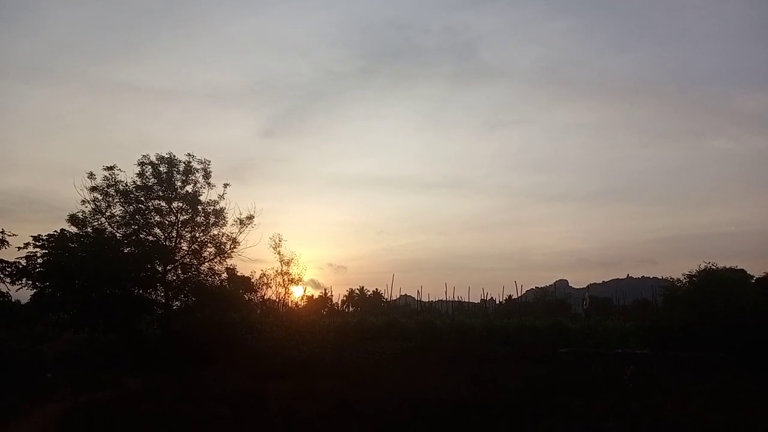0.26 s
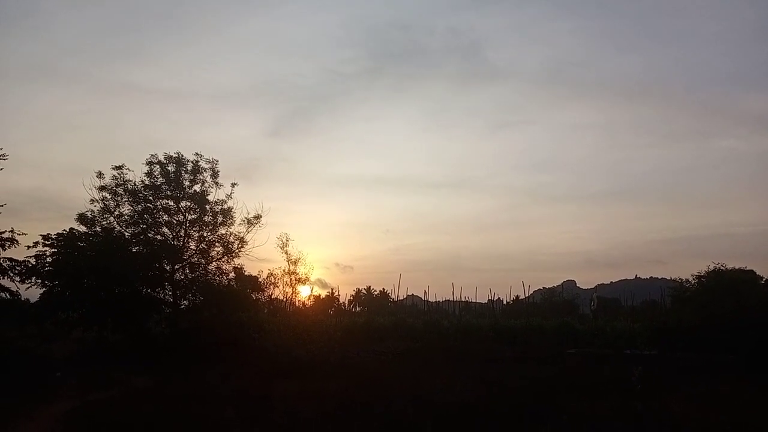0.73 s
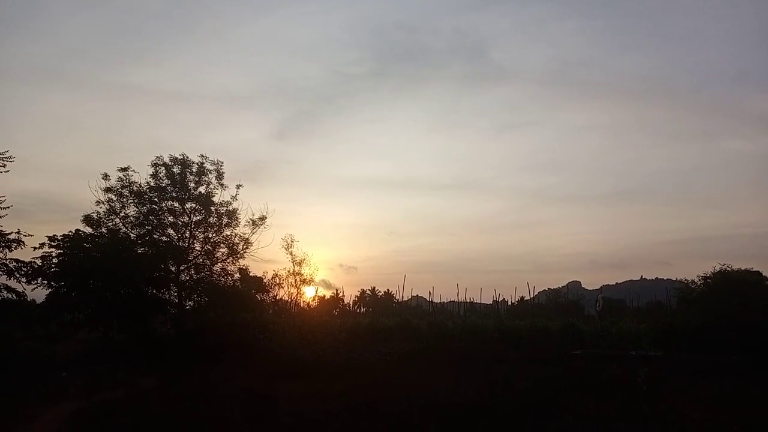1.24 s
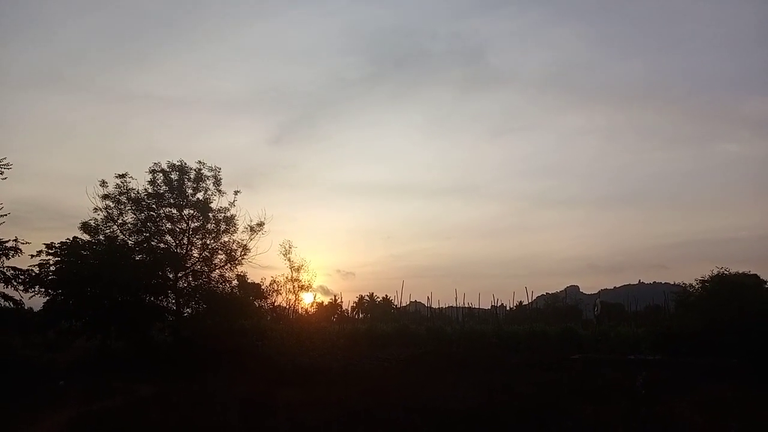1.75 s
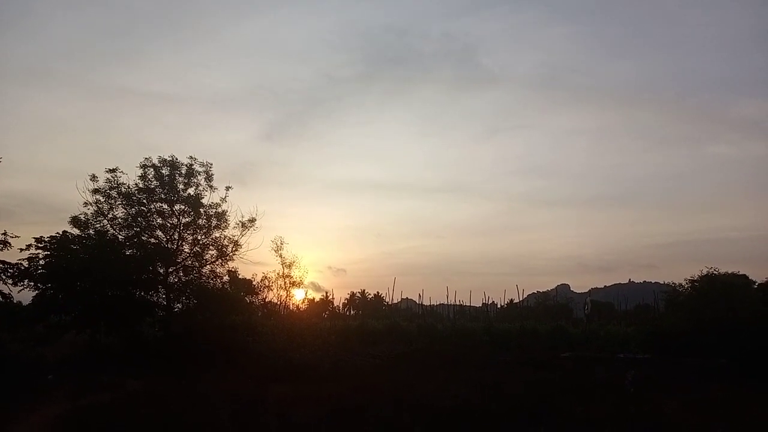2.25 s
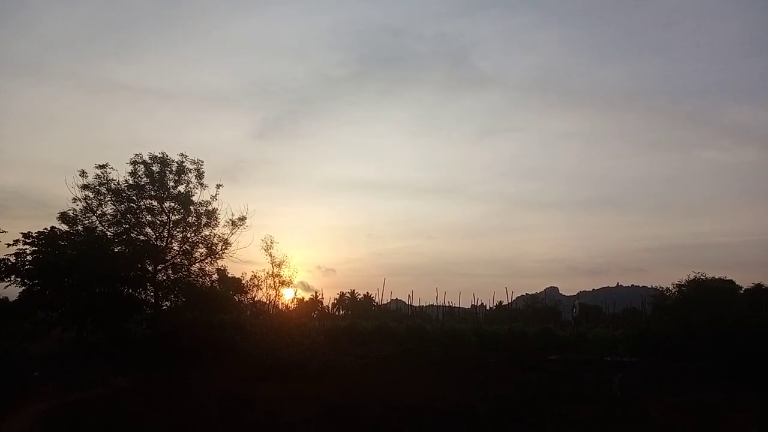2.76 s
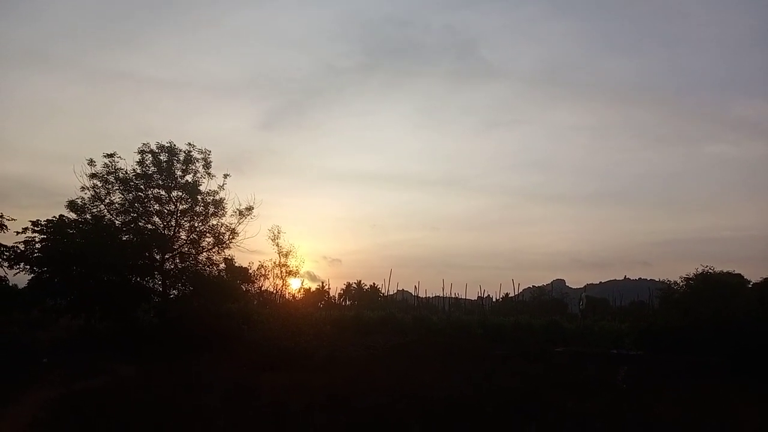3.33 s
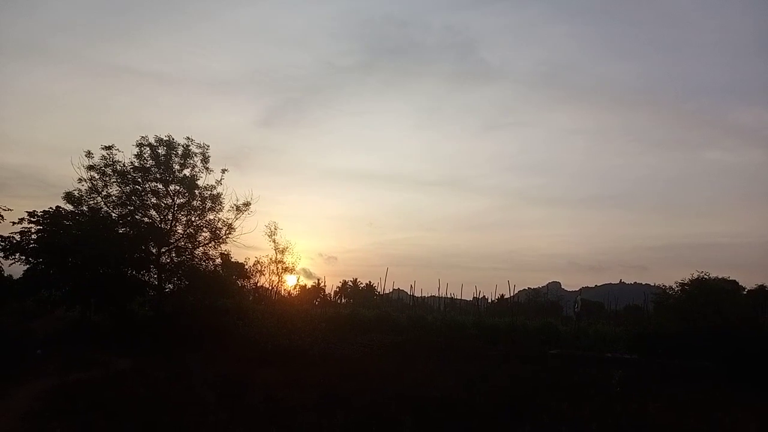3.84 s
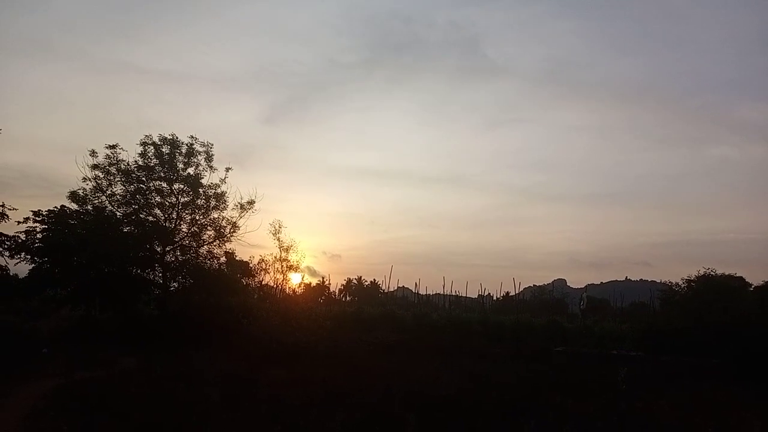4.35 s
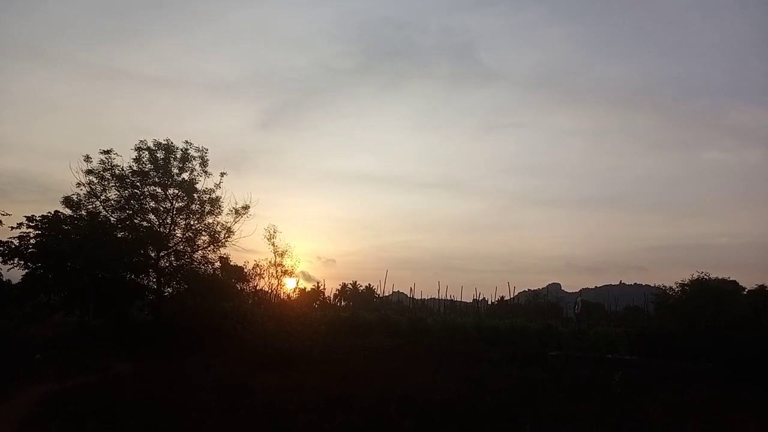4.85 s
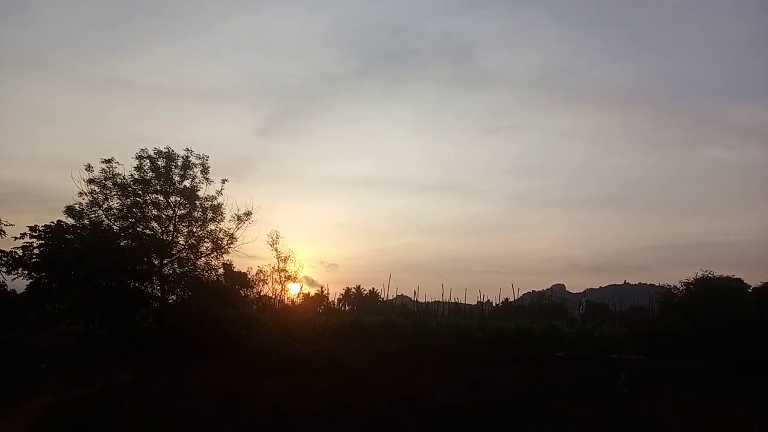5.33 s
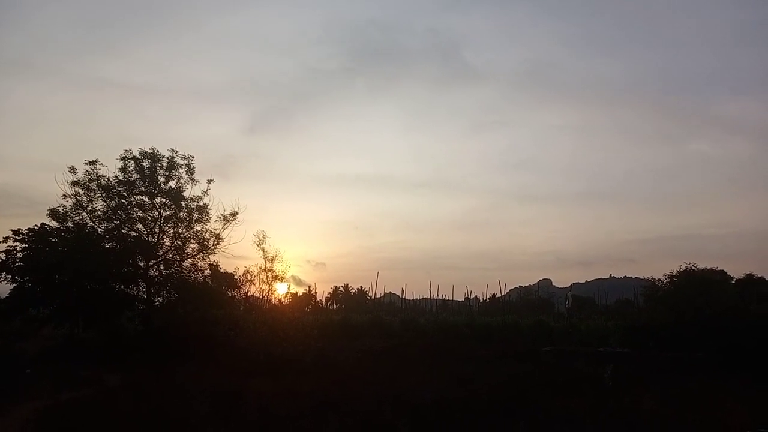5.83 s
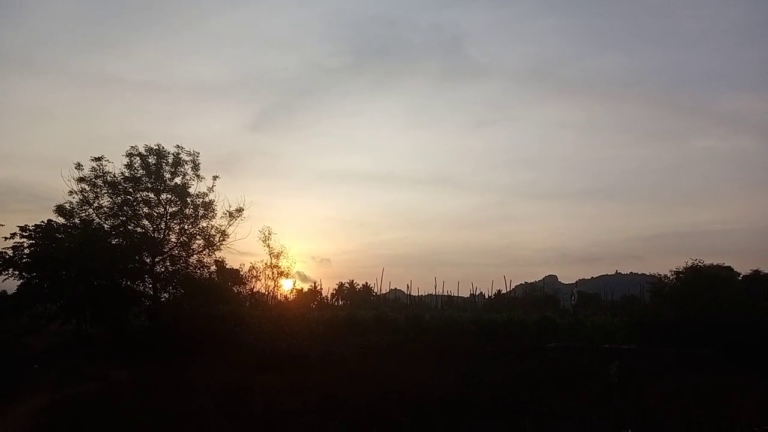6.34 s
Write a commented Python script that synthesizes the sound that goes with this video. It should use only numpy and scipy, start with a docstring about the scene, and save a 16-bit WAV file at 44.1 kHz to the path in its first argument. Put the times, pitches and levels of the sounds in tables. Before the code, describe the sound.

Still dawn air in open country with trees, picked up by a small handheld stereo microphone. From about 0.15 to 0.6 s one loud, hollow cuckoo tone dips, swoops up and drops sharply, echoing off trees, while dull bumps knock the microphone. A distant engine putters in a low throbbing hum, strongest in the first second, then recedes; a high patchy hiss holds until 1.3 s and dies away. Far chirps are denser before 2.6 s. Hoarse short squawks come at 1.2, 1.6 and 2.0 s, low yelps at 2.1 and 2.35, with blurred distant rasps. Thin high whistles sink slowly from about 2 to 2.9 and 3.2 to 4.2 s. Small birds chatter around 3.5 and 4.7-5.5 s amid soft hoots and slurs. A faint insect tone flickers after 4.6 s, with one tiny snap. At 6.3 s soft bumps return, then two birds whistle together, one high and sinking, one low and wavering.

```python
"""Dawn over open country. Soft bumps on the microphone open, as a cuckoo's one loud swooping tone rings in the trees.
A distant engine putters as a harmonic series; a high noise hiss over still air holds, then dies away.
Then come hoarse squawks of harmonics and noise, low yelps and thin whistles; small birds chatter in gliding tones,
and far ones hoot, slur, chirp and rasp in narrow noise bands. Later a faint insect tone comes and goes and
one tiny snap ticks; near the end come more bumps, then two birds whistle at once."""
import sys
import numpy as np
from scipy import signal
from scipy.fft import rfft, irfft, next_fast_len
from scipy.io import wavfile
from scipy.ndimage import uniform_filter1d, map_coordinates

SR = 44100
rng = np.random.default_rng(int(sys.argv[2]) if len(sys.argv) > 2 else 0)


def unload_audio(sound):
    """Save the sound as a 16-bit wav file, at the path given as the first command line argument."""
    columns = np.transpose(np.atleast_2d(sound))
    # keep every value between -1 and 1, then stretch to whole-number steps
    steps = np.round(np.clip(columns, -1, 1) * 32767)
    wavfile.write(sys.argv[1], SR, steps.astype(np.int16))


N = 290619  # length in samples
VOICE_ATTACK_S, VOICE_RELEASE_S = 0.0031, 0.0048  # end fades of the cuckoo and of the two phrases


def amp(db):
    """Decibels to gain."""
    return 10 ** (np.asarray(db) / 20)


def unit(x):
    """Scale to rms 1."""
    return x / np.sqrt(np.mean(x ** 2) + 1e-20)


def along(points, hz):
    """Read (Hz, value) points on a log frequency axis."""
    f, v = np.transpose(points)
    return np.interp(np.log(hz + 1), np.log(f + 1), v)


def curves(rows, t):
    """Each column after the time, read at the times t."""
    s, *cols = np.transpose(rows)
    return [np.interp(t, s, c) for c in cols]


def wobble(rate, n):
    """A smooth random curve of n samples, rate knots a second."""
    knots = rng.standard_normal(int(n * rate / SR) + 4)
    return map_coordinates(knots, [np.arange(n) * rate / SR])


def filtered(x, response):
    """Filter x by a response given as a function of frequency."""
    m = next_fast_len(N + SR // 2)
    spectrum = rfft(x, m) * response(np.fft.rfftfreq(m, 1 / SR))
    return irfft(spectrum, m)[..., :N]


def add(track, s, sound):
    """Mix a sound into a track at s seconds."""
    part = track[max(0, round(s * SR)):][:len(sound)]
    part += sound[:len(part)]


def turns(hz):
    """Phase of a moving frequency."""
    return 2 * np.pi * np.cumsum(hz) / SR


def tone(phase):
    """A sine of rms 1."""
    return np.sqrt(2) * np.sin(phase)


def gate(t, attack_s, release_s):
    """Straight fades at both ends of the times t."""
    return np.clip(np.minimum((t - t[0]) / attack_s, (t[-1] - t) / release_s), 0, 1)


def noise(colour, width):
    """Coloured stereo noise; width is the side's share."""
    mid, side = filtered(rng.standard_normal((2, N)), lambda hz: amp(along(colour, hz)))
    return unit(mid) + width * np.outer([1, -1], unit(side))


def patchy(x, depth_db):
    """Break a stereo noise into brief, narrow patches of random gain."""
    z = signal.stft(x, nperseg=512)[2]
    field = uniform_filter1d(rng.standard_normal(z.shape[1:]), size=3, axis=0)  # over frequency
    field = uniform_filter1d(field, size=8, axis=1)  # over time
    return unit(signal.istft(z * amp(depth_db * unit(field)), nperseg=512)[1][:, :N])


def note(length, pitch_hz, glide, arch, rough, rough_rate):
    """Phase and swell of one note: its pitch glides, droops at both ends by the share arch, and trembles."""
    u = np.linspace(-1, 1, max(8, int(length * SR)))
    hz = pitch_hz * (1 + glide * u / 2 - arch * u ** 2)
    phase = turns(hz * (1 + rough * wobble(rough_rate, len(u))))
    return phase, signal.windows.tukey(len(u), .45)


def notes(rows, arch, rough, rough_rate, flutter_db):
    """Single-tone notes with a fluttering level, from rows (start_s, length_s, pitch_hz, level_db, glide)."""
    out = np.zeros(N)
    for s, length, hz, db, glide in rows:
        phase, swell = note(length, hz, glide, arch, rough, rough_rate)
        level = amp(db + flutter_db * wobble(110.0, len(swell)))
        add(out, s, swell * level * tone(phase))
    return out


# The cuckoo's swooping pitch: (time_s, pitch_hz)
CUCKOO_PITCH = [(0.168, 1495), (0.21, 1412), (0.27, 1380), (0.335, 1421), (0.42, 1613), (0.48, 1709),
                (0.52, 1632), (0.56, 1373)]
# Its loudness through the call: (time_s, level_db)
CUCKOO_LEVEL = [(0.148, -42), (0.171, -29.5), (0.19, -26.5), (0.204, -34.5), (0.225, -29), (0.325, -29),
                (0.341, -34.5), (0.357, -23.5), (0.389, -23.5), (0.421, -28), (0.46, -19), (0.509, -22.5),
                (0.52, -35), (0.528, -26.5), (0.567, -30), (0.605, -49.5)]
# Its harmonics 2 to 8, against the fundamental: (db_at_lowest_pitch, db_at_highest_pitch)
CUCKOO_OVERTONES = [(-31, -28.5), (-38, -26.5), (-25, -24), (-22, -28), (-33, -46), (-37, -36.5),
                    (-44.5, -47)]
FINAL_DROP_HZ_PER_S = 7500  # steady fall after the last pitch point


def cuckoo(jitter=0.0021, crack=0.033, crack_s=.017, flutter_db=3, dull_db_per_hz=0.1):
    """A swooping tone and, apart from it, weak overtones that shift with the pitch and flutter through the leaves."""
    t = np.arange(CUCKOO_LEVEL[0][0], CUCKOO_LEVEL[-1][0], 1 / SR)
    drop_hz = FINAL_DROP_HZ_PER_S * np.maximum(t - CUCKOO_PITCH[-1][0], 0)
    pitch, = curves(CUCKOO_PITCH, t)
    height = (pitch - pitch.min()) / np.ptp(pitch)
    hz = uniform_filter1d(pitch - drop_hz, size=1000, mode="nearest")
    level_db, = curves(CUCKOO_LEVEL, t)
    swell = gate(t, VOICE_ATTACK_S, VOICE_RELEASE_S) * amp(level_db)
    unsteady = jitter + crack * np.exp(-(t - t[0]) / crack_s)  # the voice cracks as it starts
    phase = turns(hz * (1 + unsteady * wobble(560, len(t))))
    fundamental, overtones = np.zeros((2, N))
    add(fundamental, t[0], swell * tone(phase))
    for k, (low_db, high_db) in enumerate(CUCKOO_OVERTONES, 2):
        db = low_db + height * (high_db - low_db)
        db = db - dull_db_per_hz * drop_hz + flutter_db * wobble(160, len(t))
        add(overtones, t[0], swell * tone(k * phase) * amp(db))
    return fundamental, overtones


# Hoarse cries: (start_s, length_s, pitch_hz, level_db before the harmonics' own levels, force 0-1)
SQUAWK_CRIES = [(1.241, 0.043, 1960, -47, 0.24), (1.584, 0.028, 1967, -43.5, 0.08),
                (1.613, 0.046, 2204, -43.5, 0.77), (1.996, 0.02799, 2042, -45.5, 0.05),
                (2.026, 0.059, 2309, -45, 0.86)]
# Harmonics 1 to 3 of a squawk without force: [level_db of each]
SOFT_HARMONICS = [-15, -5.5, -24]
# The same harmonics at full force: [level_db of each]
FORCED_HARMONICS = [-3.5, -5.5, 1.5]
# Relative colour of the squawks' hoarse noise: (frequency_hz, level_db)
HOARSE_COLOUR = [(1500, -44.5), (2400, 0.5), (3600, 15), (4400, 15), (5200, -42), (6500, 21), (7800, 6.5),
                 (9500, -7.5), (15000, -31)]


def squawks(scoop=.12, forced_scoop=.18, droop=.07, rough=.011, flutter_db=1.8,
            top_db=-22, fall_db=-4, hoarse_db=-6.5):
    """Short hoarse cries that leap to their pitch and hold it; force deepens the leap and changes the harmonics."""
    out, effort = np.zeros((2, N))
    for s, length, hz, db, force in SQUAWK_CRIES:
        u = np.linspace(0, 1, int(length * SR))
        leap = (scoop + force * forced_scoop) * (1 - u) ** 5
        shape = 1 - leap - droop * u ** 5
        phase = turns(hz * shape * (1 + rough * wobble(1195, len(u))))
        swell = signal.windows.tukey(len(u), .5)
        levels = [soft + force * (forced - soft)
                  for soft, forced in zip(SOFT_HARMONICS, FORCED_HARMONICS)]
        third_db = levels[-1]
        levels += [third_db + top_db, third_db + top_db + fall_db]  # harmonics 4 and 5
        for k, level in enumerate(levels, 1):
            gain = amp(db + level + flutter_db * wobble(400, len(u)))
            add(out, s, swell * gain * tone(k * phase))
        add(effort, s, swell * amp(db + hoarse_db))
    breath = patchy(noise(HOARSE_COLOUR, width=0), depth_db=7.5)[0]
    return out + uniform_filter1d(effort, size=1100) * breath


# Low yelps: (start_s, length_s, pitch_hz, level_db, glide as a share of the pitch)
YELP_NOTES = [(2.082, 0.02335, 1180, -51, 0.035), (2.095, 0.04974, 1606, -64.5, 0.12),
              (2.108, 0.038, 1191, -54, -0.33335), (2.33, 0.0474, 1227, -48, 0.207),
              (2.372, .045, 1188, -59.5, -0.078)]


def yelps():
    """Brief low tones whose pitch arches strongly and trembles fast."""
    return notes(YELP_NOTES, arch=0.07, rough=0.022, rough_rate=2000, flutter_db=2)


# A small bird's quick notes: (start_s, length_s, pitch_hz, level_db, glide as a share of the pitch)
CHATTER_NOTES = [(.83, 0.051, 2734, -65, 0.1139), (1.139, 0.02817, 3330, -52, -0.042),
                 (1.205, 0.024, 3183, -52, -0.07446), (1.352, 0.021, 2645, -55, 0.0862),
                 (2.425, 0.045, 3406, -65, -0.14), (2.447, 0.036, 3424, -56, -0.1843),
                 (2.61, 0.02542, 3751, -68, 0.0201), (2.71, 0.022, 2800, -60.5, -0.053),
                 (3.43, 0.016646, 2890, -63, 0.0139), (3.44, 0.025, 3243, -56.5, -0.0042),
                 (3.51, 0.03, 3930, -70, -0.12), (3.59, 0.0275, 2610, -55, 0.016),
                 (3.62, 0.029, 3810, -71, 0.037), (3.63, 0.036, 2308, -55.5, 0.13),
                 (3.676, 0.016, 2950, -53.5, 0.0392), (3.695, 0.039, 3090, -63.5, 0.0201),
                 (3.73, 0.026, 3237, -56.5, -0.25), (4.735, 0.05484, 4163, -68, -0.087),
                 (4.768, 0.012, 4430, -64, -0.037), (4.77, 0.01701, 3740, -66, -0.1),
                 (4.828, 0.03, 4400, -66, 0.085), (4.845, 0.023335, 3700, -62, -0.0227),
                 (4.888, 0.034, 2720, -64, -0.0902), (4.922, 0.01763, 2935, -63.5, 0.058),
                 (4.942, 0.037, 4320, -70.5, 0.05), (5.1, 0.072, 3518, -67, -0.058),
                 (5.108, 0.04454, 2804, -73.5, -0.1125), (5.112, 0.026, 3280, -54.5, -0.03),
                 (5.169, 0.01868, 2720, -61, -0.055), (5.178, 0.017883, 3146, -54, -0.069),
                 (5.226, 0.01645, 2640, -62, -0.0192), (5.329, 0.028, 2675, -55.5, 0.04),
                 (5.371, 0.021, 2428, -57.5, 0.0082), (5.408, 0.041, 3166, -53.5, 0.049),
                 (5.451, 0.0178, 3430, -57, 0.16), (5.469, 0.021, 3541, -51.5, 0.067),
                 (5.926, 0.02094, 3013, -70.5, 0.0641)]


def chatter(slap_s=.027, slap_db=-12):
    """A small bird's quick notes, each thrown back once by a tree close by."""
    direct = notes(CHATTER_NOTES, arch=.02, rough=.013, rough_rate=600, flutter_db=1.5)
    out = direct.copy()
    add(out, slap_s, amp(slap_db) * direct)
    return out


# Long thin whistles: (top_s, top_pitch_hz, final_level_db before the release)
WHISTLE_TOPS = [(2.081, 7624, -62.5), (3.34, 7450, -58.5)]
WHISTLE_RISE_S, WHISTLE_HOLD_S, WHISTLE_RELEASE_S = 0.15, 0.84892, 0.03041  # the release ends the hold
WHISTLE_SCOOP, WHISTLE_SAG, WHISTLE_SAG_S = .12, .145, .65  # scoop and sag are shares of the top pitch
WHISTLE_SWELL_DB_PER_S = 10


def whistles(jitter=0.0033, flutter_db=1.5):
    """Each whistle scoops up to its top, then sinks ever more slowly while it swells."""
    out = np.zeros(N)
    t = np.arange(-WHISTLE_RISE_S, WHISTLE_HOLD_S, 1 / SR)  # seconds from the top
    rise = 1 - WHISTLE_SCOOP * (t / WHISTLE_RISE_S) ** 2
    sink = 1 - WHISTLE_SAG * (1 - np.exp(-t / WHISTLE_SAG_S))
    shape = np.where(t < 0, rise, sink)
    swell = amp(WHISTLE_SWELL_DB_PER_S * (t - WHISTLE_HOLD_S))
    swell = swell * gate(t, WHISTLE_RISE_S, WHISTLE_RELEASE_S)
    for s, hz, db in WHISTLE_TOPS:
        phase = turns(hz * shape * (1 + jitter * wobble(165.7, len(t))))
        level = amp(db + flutter_db * wobble(30.93, len(t)))
        add(out, s - WHISTLE_RISE_S, swell * level * tone(phase))
    return out


# A high whistle that sinks and plunges: (time_s, pitch_hz, level_db)
SINKING_PHRASE = [(6.32, 4420, -80), (6.42, 4330, -65), (6.495, 3998, -71), (6.525, 3850, -58.5),
                  (6.57, 3751, -56), (6.595, 3230, -63)]
# A low whistle that rises and falls: (time_s, pitch_hz, level_db)
WAVY_PHRASE = [(6.401, 1270, -78), (6.44, 1420, -71), (6.465, 1342, -64.5), (6.51, 1570, -69),
               (6.535, 1366, -63.5), (6.566, 1210, -74.5)]


def phrases(jitter=.004, flutter_db=1.8):
    """Two birds whistle at once, each a single tone along its own pitch and level curve."""
    out = np.zeros(N)
    for rows in (SINKING_PHRASE, WAVY_PHRASE):
        t = np.arange(rows[0][0], rows[-1][0], 1 / SR)
        hz, db = curves(rows, t)
        phase = turns(hz * (1 + jitter * wobble(297, len(t))))
        level = amp(db + flutter_db * wobble(71, len(t)))
        add(out, t[0], gate(t, VOICE_ATTACK_S, VOICE_RELEASE_S) * level * tone(phase))
    return out


# Falling slurs: (start_s, length_s, pitch_hz, level_db)
FALLING_SLURS = [(0.807, 0.12, 3500, -71), (3.133, 0.16253, 1841, -76.5), (3.377, 0.0997, 3520, -69.5),
                 (3.887, 0.078, 3449, -67), (4.527, 0.13346, 6560, -65.5), (4.89, 0.13, 3627, -63),
                 (5.648, 0.0801, 3684, -73.5), (6.225, 0.04611, 1446, -74.5)]
# Rising slurs: (start_s, length_s, pitch_hz, level_db)
RISING_SLURS = [(.01, 0.12, 3070, -59.5), (3.091, 0.04602, 3509, -75), (4.597, 0.03685, 4509, -72),
                (4.932, 0.015, 6444, -65.5), (5.248, 0.046, 6610, -75), (5.242, 0.18, 1238, -82),
                (5.691, 0.1, 5720, -68), (5.775, 0.075, 3850, -70.5), (5.867, 0.088, 5790, -66.5),
                (6.043, 0.06744, 5970, -74)]
FALL_GLIDE, RISE_GLIDE = -0.15, .18  # shares of the pitch


def slurs():
    """Clear drawn-out notes; all falling ones share one glide, all rising ones another."""
    rows = [(*row, FALL_GLIDE) for row in FALLING_SLURS]
    rows += [(*row, RISE_GLIDE) for row in RISING_SLURS]
    return notes(rows, arch=0.013, rough=0.007, rough_rate=300, flutter_db=3)


# Far birds' held notes: (start_s, length_s, pitch_hz, level_db)
HOOT_NOTES = [(0.033, 0.19, 1369, -69), (2.081, 0.2, 2295, -72), (2.135, 0.066, 2770, -72.5),
              (3.882, 0.071, 730, -66.5), (4.467, 0.029, 2316, -71), (4.872, 0.12, 415.4, -79.5),
              (5.369, 0.0908, 425, -78)]


def hoots():
    """Soft notes without a glide, slightly arched in pitch."""
    rows = [(*row, 0) for row in HOOT_NOTES]
    return notes(rows, arch=0.023, rough=0.0029, rough_rate=64, flutter_db=5.0)


# Far rasping calls: (start_s, level_db before the trim, change_db of the upper bands)
RASP_CALLS = [(1.36, -61, 5.5), (2.264, -63, 6), (3.419, -71, -23), (4.741, -75, -26)]
# The noise bands of every rasp: (delay_s, length_s, pitch_hz, level_db, knots_per_s of the random swing)
RASP_NOISE_BANDS = [(-.01, 0.299, 1386, 2, 380), (0.032, 0.226, 900, -8, 110), (0.025, 0.18, 2860, 1, 320),
                    (0.079, 0.31, 2530, -3.5, 360), (0.075, .33, 2230, 0, 312),
                    (0.26, 0.115, 860, -12.5, 130)]


def rasps(trim_db=-4.0, glide=-0.0645, upper_hz=1800):
    """Distance blurs each harsh call into a few narrow, sinking bands of noise."""
    out = np.zeros(N)
    for s, db, upper_db in RASP_CALLS:
        for delay, length, hz, band_db, knots in RASP_NOISE_BANDS:
            phase, swell = note(length, hz, glide, 0, 0.0118, 197.0)
            band = wobble(knots, len(swell)) * np.sin(phase)
            band = band + wobble(knots, len(swell)) * np.cos(phase)
            level_db = db + trim_db + band_db + upper_db * (hz > upper_hz)
            add(out, s + delay, swell * amp(level_db) * band)
    return out


def chorus(count=200, low_hz=2000, high_hz=4500, glide=0.11, arch=0.015, early_db=-75, late_db=-83,
           fade_start_s=2.57, fade_s=0.34, scatter_db=2):
    """Many far birds chirp at random, more loudly in the first seconds."""
    level_dice, length_dice, glide_dice = rng.standard_normal((count, 3)).T
    when, pitch = rng.uniform(0, 1, (count, 2)).T
    s = (np.arange(count) + when) * N / SR / count  # one chirp in each equal slot
    db = np.interp(s, [fade_start_s, fade_start_s + fade_s], [early_db, late_db])
    db = db + scatter_db * level_dice
    length = 0.019 * np.exp(0.57 * length_dice)
    hz = low_hz * (high_hz / low_hz) ** pitch
    rows = np.transpose([s, length, hz, db, glide * glide_dice])
    return notes(rows, arch, rough=0.031, rough_rate=1600, flutter_db=3.0)


def insect(pitch_hz=6470, level_db=-84.0, start_s=4.63, rough=.008):
    """A faint trembling tone that comes and goes in random bouts late in the scene."""
    t = np.arange(N) / SR
    bouts = np.clip(wobble(14, N) + .2, 0, 1)
    phase = turns(pitch_hz * (1 + rough * wobble(620, N)))
    return (t > start_s) * bouts * amp(level_db) * tone(phase)


def tick(s=4.672, db=-69, t60=0.15, hz=10550, knots_per_s=2000):
    """One tiny bright snap, a short decaying band of noise."""
    out, t = np.zeros(N), np.arange(SR // 2) / SR
    add(out, s, amp(db - 60 * t / t60) * wobble(knots_per_s, len(t)) * tone(2 * np.pi * hz * t))
    return out


# Soft knocks on the microphone: (start_s, level_db before the band filter, pitch_hz, t60_s)
MICROPHONE_BUMPS = [(.184, -43.5, 242.2, 0.11), (0.245, -43, 234, 0.2), (0.305, -38, 205, 0.099),
                    (6.343, -39, 348.1, 0.015), (6.399, -37, 350, 0.015), (6.403, -45, 136, 0.08274)]


def bumps(rustle=0.13, low_hz=130, high_hz=480):
    """Dull, quickly damped knocks with a little rubbing after them, heard through the camera's case."""
    out, t = np.zeros(N), np.arange(SR // 5) / SR
    onset = 1 - np.exp(-t / 0.0002)
    for s, db, hz, t60 in MICROPHONE_BUMPS:
        knock = np.sin(2 * np.pi * hz * t) * amp(-60 * t / t60)
        rub = rustle * wobble(903, len(t)) * amp(-60 * t / 0.26)
        add(out, s, amp(db) * (knock + rub) * onset)
    case = signal.butter(2, [low_hz, high_hz], "band", fs=SR, output="sos")
    return signal.sosfilt(case, out)


# The distant engine's speed: (time_s, firings_per_s)
FIRING_RATE = [(0, 34.2), (3.3, 33), (4.2, 31.7), (6.6, 31.4)]
# Its loudness before the trim: (time_s, level_db)
ENGINE_LEVEL = [(0.0, -53.5), (0.09, -53), (0.27, -44), (0.37, -48), (0.48, -46), (0.7, -54), (1.0, -55),
                (1.09, -49.5), (1.33, -63.5), (1.62, -55.5), (1.9, -63.5), (3.8, -73.5), (3.95, -70),
                (5.05, -79.5), (6.25, -75)]
# Relative colour of the exhaust, for thumps and rumble: (frequency_hz, level_db)
EXHAUST_COLOUR = [(34, -45), (67, -12.5), (101, -12), (135, -5), (168, 3), (203, -4.5), (237, -11.5),
                  (280, -17.5), (380, -28), (520, -45)]
# The exhaust's boom swells and sinks: (time_s, change_db of the booming harmonic)
BOOM_SWELL = [(0.42, -3.5), (0.65, 10), (0.92, 2.5), (1.06, -12), (1.6, 0)]
BOOM_HARMONIC = 4


def engine(trim_db=-1.0, rumble_db=-14.0, waver_db=3.0):
    """Each firing thumps the exhaust; the harmonics fade in and out with distance, and one of them booms."""
    t = np.arange(N) / SR
    rate, = curves(FIRING_RATE, t)
    db, = curves(ENGINE_LEVEL, t)
    boom_db, = curves(BOOM_SWELL, t)
    phase = turns(rate)
    thumps = np.zeros(N)
    for k in range(2, 15):
        harmonic_db = along(EXHAUST_COLOUR, k * rate) + boom_db * (k == BOOM_HARMONIC)
        harmonic_db = harmonic_db + waver_db * wobble(7, N)
        thumps += amp(harmonic_db) * np.cos(k * phase + .45 * wobble(6, N))
    rumble = amp(rumble_db) * noise(EXHAUST_COLOUR, width=0.94)
    return amp(db + trim_db) * (unit(thumps) + rumble)


# Relative colour of the high hiss: (frequency_hz, level_db)
HISS_SPECTRUM = [(1800, -10), (2600, -10.5), (4700, -5), (5200, -4), (6000, -1.5), (6900, 6.5), (8200, -5),
                 (9200, -18), (12000, -38.5), (15000, -44.5)]
# Relative colour of the still air: (frequency_hz, level_db per Hz)
AIR_SPECTRUM = [(25, -10.5), (45, -2.5), (70, 7), (150, 5.5), (250, -4.5), (400, -3), (750, -7),
                (1300, -4.5), (2000, -10), (3400, -9.5), (5200, -14.5), (6600, -11), (8300, -19.5),
                (15000, -23)]
HISS_DB, HISS_HOLD_S, HISS_FADE_DB_PER_S = -61.5, 1.34, 11.5


def background(air_db=-75):
    """Still morning air as coloured noise, and a high patchy hiss that holds, then dies away."""
    t = np.arange(N) / SR
    db = HISS_DB - HISS_FADE_DB_PER_S * np.maximum(t - HISS_HOLD_S, 0)
    flicker_db = 1.2 * wobble(8, N) + 1.2 * wobble(70, N)
    hiss = amp(db + flicker_db) * patchy(noise(HISS_SPECTRUM, width=.2), depth_db=4.0)
    air = amp(air_db + 1.6 * wobble(3.6, N)) * noise(AIR_SPECTRUM, width=0.41)
    return hiss + air


# Ringing of the tree line: (frequency_hz, t60_s)
TREE_LINE = [(300, 0.34), (1500, 1.3), (2300, 0.36), (3000, 0.49), (5000, 0.68), (7000, 1.7), (10000, 0.71)]


def outdoors(x, near_db, far_db, near_t60=0.2, width=0.21):
    """Nearby leaves scatter the sound at once; the tree line rings on, each pitch with its own decay."""
    hz, t, z = signal.stft(rng.standard_normal((2, SR)), SR, nperseg=256)
    decay = amp(-60 * t / along(TREE_LINE, hz)[:, None])
    build_up = 1 - np.exp(-t / 0.098)
    far = signal.istft(z * decay * build_up, SR, nperseg=256)[1][:, :SR]
    t = np.arange(SR) / SR
    near = rng.standard_normal((2, SR)) * amp(-60 * t / near_t60) * (1 - np.exp(-t / 0.0033))
    tail = amp(near_db) * near / np.linalg.norm(near[0])
    tail = tail + amp(far_db) * far / np.linalg.norm(far[0])
    mid, side = signal.fftconvolve(x[None], tail, axes=1)[:, :N]
    return x + mid + width * np.outer([1, -1], side)


# Clumps of trees that answer the cuckoo and the squawks: (delay_s, level_db before each send)
TREE_CLUMPS = [(.12, -23), (.25, -32), (.36, -32.5), (0.549, -55)]


def echoes(x, smear_t60=.17):
    """Each clump of trees sends back one smeared copy."""
    response, t = np.zeros(SR), np.arange(SR // 5) / SR
    for delay, db in TREE_CLUMPS:
        burst = rng.standard_normal(len(t)) * amp(-60 * t / smear_t60)
        add(response, delay, amp(db) * burst / np.linalg.norm(burst))
    return signal.fftconvolve(x, response)[:N]


# Stereo lean of everything but the engine: (frequency_hz, left_minus_right_db)
STEREO_LEAN = [(100, 4.5), (250, 5.5), (700, 4), (1300, 7), (2400, 4), (4400, 4.5), (6000, 3.5),
               (8000, -11), (11000, -14.5), (15000, 5)]


def scene():
    """Birds among trees, with air, insect, snap and bumps leaning left except in part of the treble; engine added."""
    fundamental, overtones = cuckoo()
    birds = outdoors(fundamental, near_db=-18, far_db=-28.5) + echoes(fundamental)
    birds += outdoors(overtones, near_db=-10, far_db=-16)
    harsh = squawks()
    birds += outdoors(harsh, near_db=-7, far_db=-18) + amp(5) * echoes(harsh)
    birds += outdoors(yelps(), near_db=-6, far_db=-25)
    birds += outdoors(chatter(), near_db=-11, far_db=-17)
    birds += outdoors(whistles(), near_db=-7.5, far_db=-26.5)
    birds += outdoors(slurs() + phrases(), near_db=-8, far_db=-13)
    birds += outdoors(hoots(), near_db=-4, far_db=-12)
    birds += outdoors(rasps(), near_db=-6.5, far_db=-16.0)
    birds += outdoors(chorus(), near_db=-2, far_db=-8)

    def lean(hz):
        """Left and right gains whose mean is 1."""
        sides = amp(np.outer([.5, -.5], along(STEREO_LEAN, hz)))
        return sides / sides.mean(0)

    return filtered(birds + background() + insect() + tick() + bumps(), lean) + engine()


def record(dry, self_noise_db=-86, top_hz=15400):
    """Each microphone adds its own faint hiss; nothing above the band limit is kept."""
    self_noise = amp(self_noise_db) * rng.standard_normal((2, N))
    return filtered(dry + self_noise, lambda hz: hz < top_hz)


dry = scene()
out = record(dry)
unload_audio(out)
```